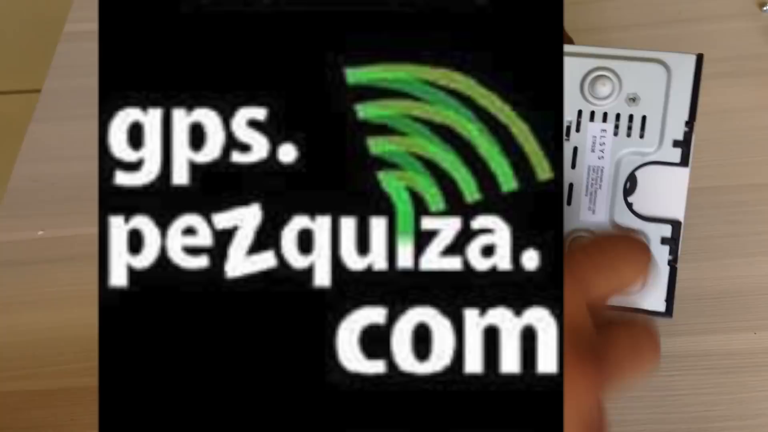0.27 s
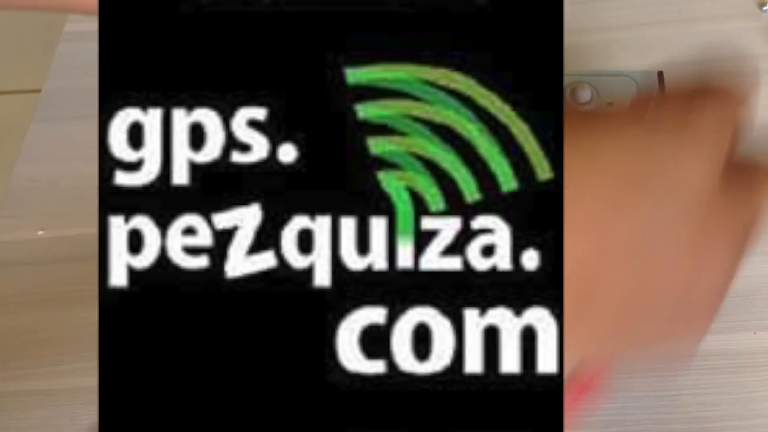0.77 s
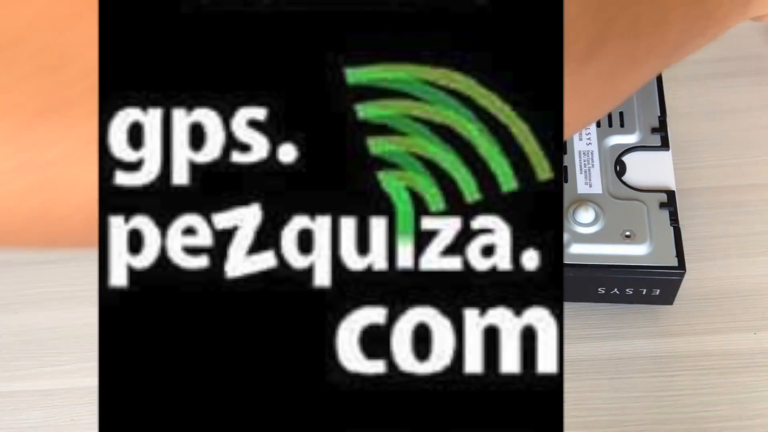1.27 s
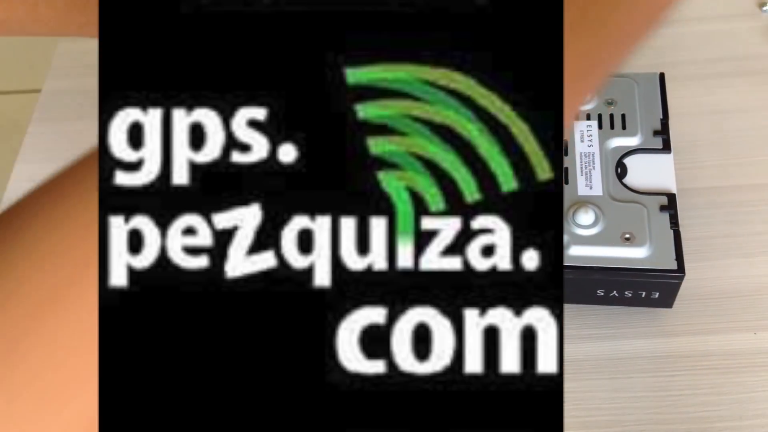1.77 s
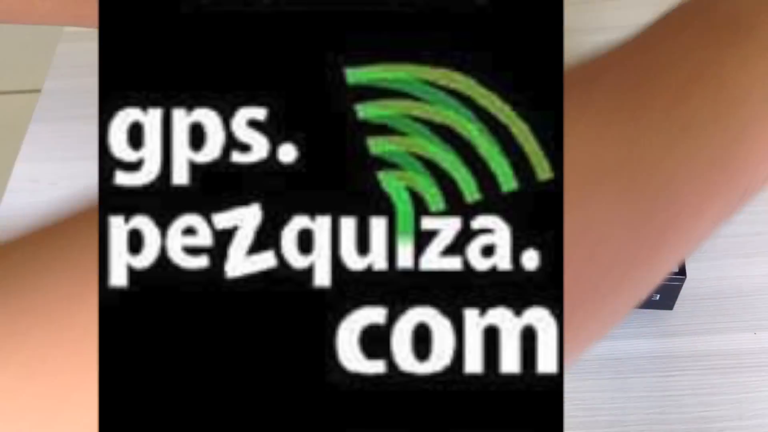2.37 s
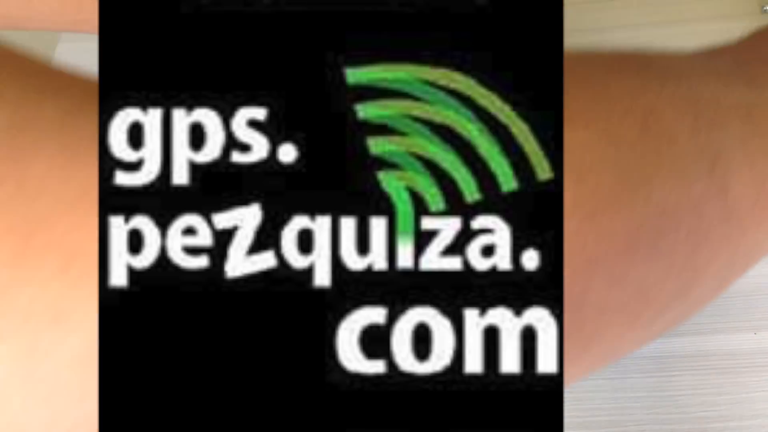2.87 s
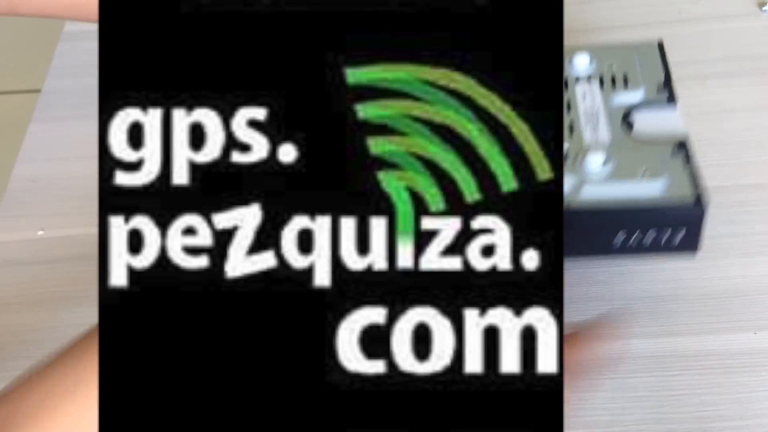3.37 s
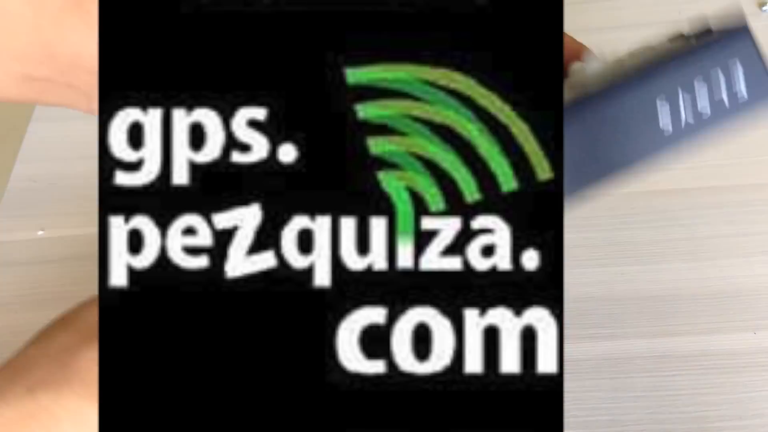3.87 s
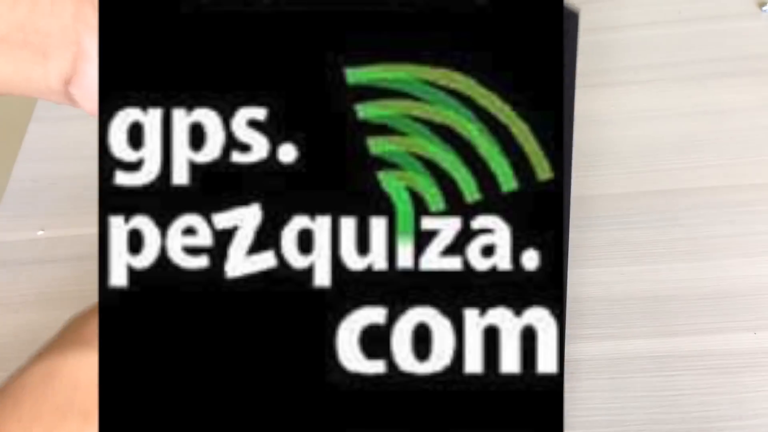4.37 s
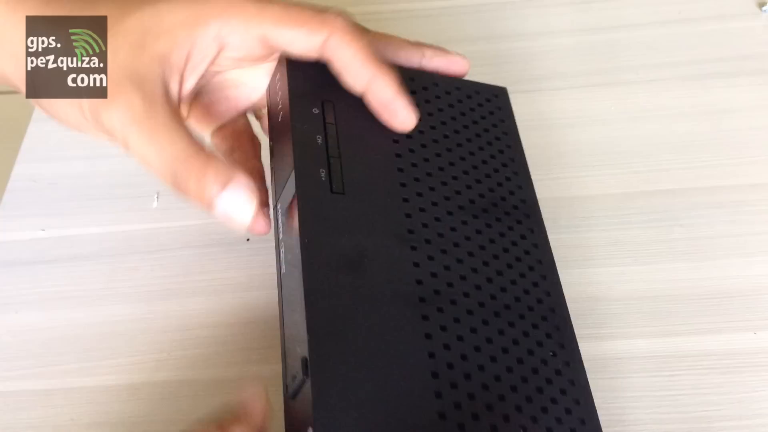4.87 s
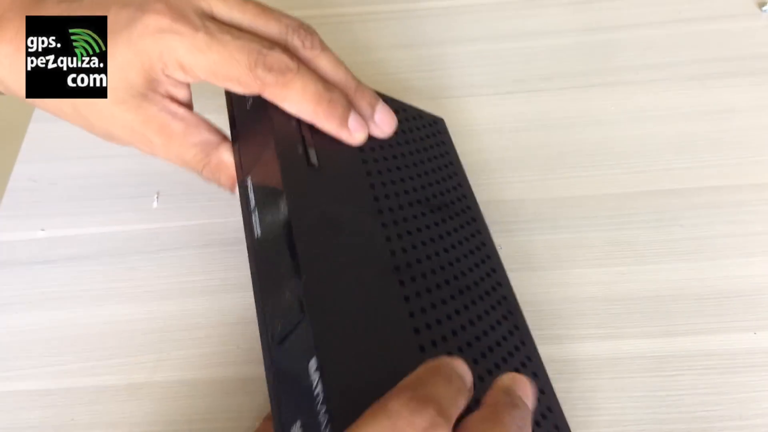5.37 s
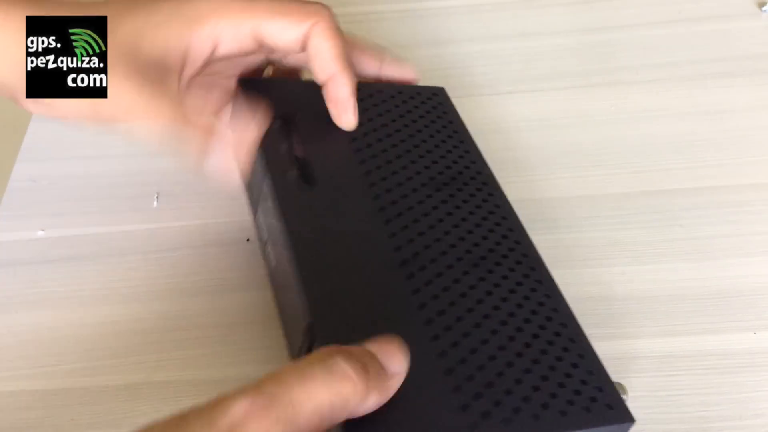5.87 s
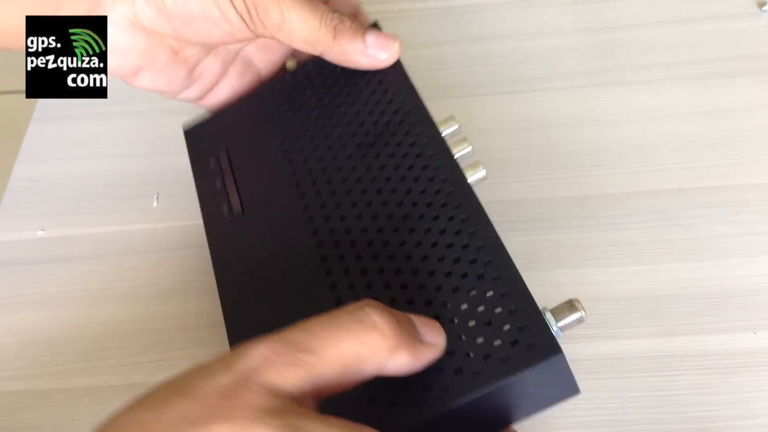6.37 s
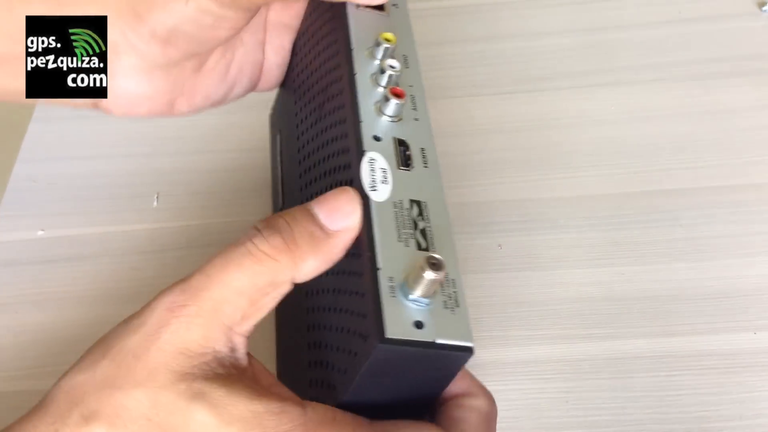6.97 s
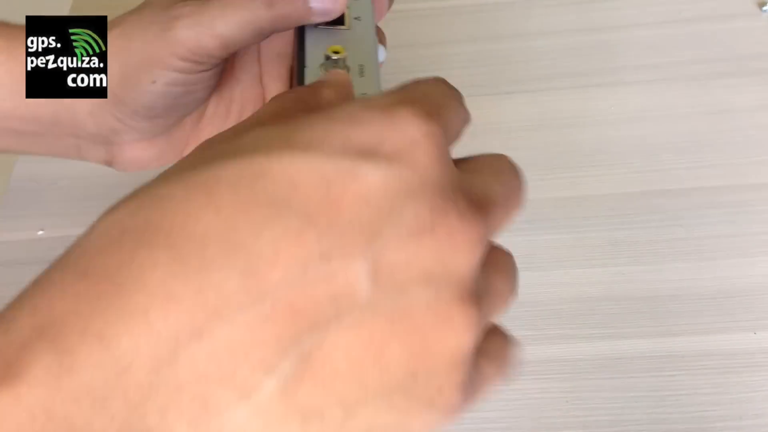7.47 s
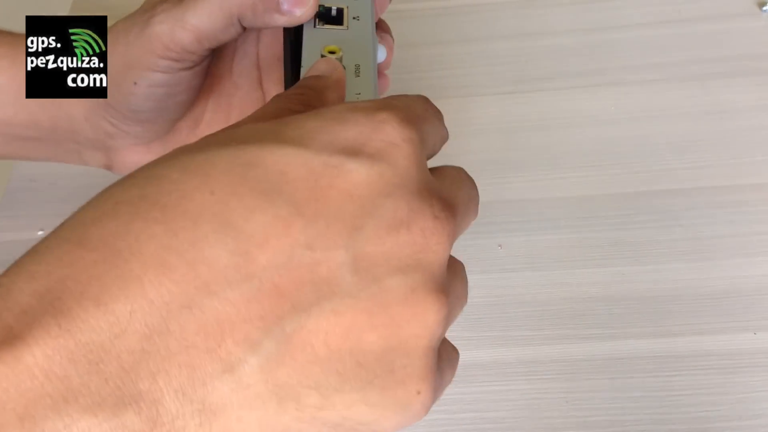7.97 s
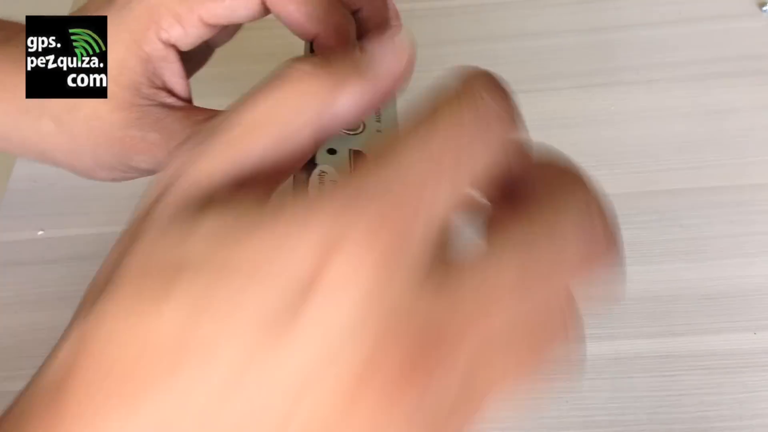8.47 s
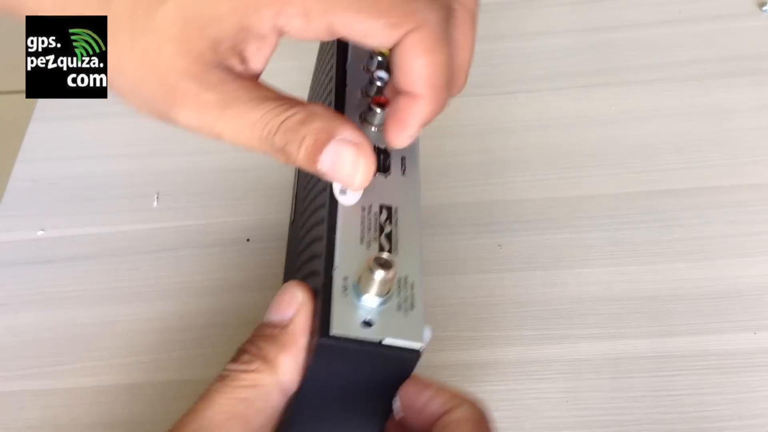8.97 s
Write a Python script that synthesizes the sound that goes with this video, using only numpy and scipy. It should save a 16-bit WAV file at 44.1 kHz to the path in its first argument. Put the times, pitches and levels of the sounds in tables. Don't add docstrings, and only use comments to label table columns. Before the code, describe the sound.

Close handling of a sheet-metal box on a wooden board, with small screw ticks, a dropped tool's bright clatter, hard knocks, rubbing and creaks.

```python
import sys
import numpy as np
from scipy import signal
from scipy.fft import rfft, irfft, next_fast_len
from scipy.io import wavfile
from scipy.ndimage import uniform_filter1d, map_coordinates

SR = 44100
rng = np.random.default_rng(int(sys.argv[2]) if len(sys.argv) > 2 else 0)


def wav_out(sig):
    wavfile.write(sys.argv[1], SR, np.round(np.clip(np.atleast_2d(sig).T, -1, 1) * 32767).astype(np.int16))


def how_loud(loudness_db):
    steps = np.asarray(loudness_db, float) / 20
    return 10 ** steps


N = 406161

# pitch_hz, density_db
HISS_COLOUR = [(25, -26.5), (55, -7.5), (190, -7.5), (250, -1), (400, -8.5), (1600, -12), (8000, -13.5),
               (16000, -15)]
# pitch_hz, width_hz, level_db
BOARD_MODES = [(90.6, 22, -24.5), (157, 13, -4.5), (198.2, 26, 2.5), (208.8, 49, 0)]
# pitch_hz, width_hz, level_db
CASE_MODES = [(364, 70, 3.5), (476.5, 120, 3), (580, 210, 1), (700, 420, -10.5)]
# until_s, then rows of pitch_hz, width_hz, level_db
COVER_GRIPS = [
    (1.2, [(720, 200, 6), (1000, 300, 11), (1900, 1700, 1)]),
    (4.04, [(1000, 630, -2.5), (1680, 140, -0.5), (2110, 390, -2)]),
    (5.0, [(1140, 580, -1.5), (1520, 340, 2), (2070, 620, -1.5)]),
    (9.0, [(1004, 200, 0.5), (1504, 310, 0), (2213, 410, 0), (2750, 300, -1.5), (3150, 490, -3.5), (4234, 600, -7)]),
    (9.3, [(1700, 380, -1.5), (2470, 350, 1), (3200, 860, -4.5)]),
]
# pitch_hz, width_hz, level_db
EDGE_MODES = [(2900, 140, -1), (3744, 1200, -2.5), (5300, 1200, -3), (9000, 10000, -11.5)]
# peak_s, swell_s, fade_s, board_push_db, case_over_push_db
SLIDES = [(.45, 0.35, .5, -71, -35), (.6, 0.013, 0.36, -62, -22), (.7, 0.14, 0.27, -48, -12),
          (2.44, 0.22, 0.8, -67, -16), (4.014, 0.096, .15, -51, -14.5), (4.12, .08, 0.098, -40.5, -4.5),
          (4.154, 0.084, 0.055, -24.5, -11), (4.33, 0.26, 0.21, -42, -12.5),
          (4.408, 0.046, 0.19, -38.5, -19), (4.476, 0.025, 0.3, -34.5, -13.5),
          (4.8, 0.29, 0.041, -50, -14.5), (5.17, .55, 1, -65.5, -6), (5.45, 0.071, 0.076, -42, -7),
          (5.526, 0.0099, 0.023, -49, 0), (5.6, 0.23, 0.12, -38, -5), (5.665, 0.37, 0.023, -52, -2),
          (5.82, 0.24, 0.05, -49.5, 3.5), (6.35, 1.3, 0.34, -71.5, -7.5), (7.72, 1.8, 0.43, -69, -13),
          (8.3, 0.44, .3, -69, -11.5), (8.85, 0.37, 0.63, -71, -8), (9.03, .1, 0.097, -65, -14),
          (9.13, .2, .17, -62, -17)]
# peak_s, swell_s, fade_s, rub_db, rasp_over_rub_db
RUBS = [(.135, 0.036, 0.046, -56, -19), (.7, 0.12, 0.11, -59.5, -13), (.8, 0.3, 0.021, -59.5, -28),
        (1.15, 0.43, 0.7, -77, -7), (1.73, .12, 1, -77.5, 3), (2.45, 0.37, 0.96, -80.5, 3),
        (2.83, 0.026, 0.11, -49.5, -4), (3.95, 0.13, 0.032, -54, -7), (4.154, 0.2, 0.041, -54.5, -9),
        (4.382, 0.21, 0.3, -60.5, -4), (4.476, .04, 0.96, -67.5, -8), (4.918, 0.17, 0.53, -75.5, -1.5),
        (5.45, 0.1, 0.083, -52.5, -9), (5.56, 0.11, 0.26, -59, -7), (5.825, .55, 0.036, -55.5, -12.5),
        (6.05, .15, 0.22, -69.5, 1.5), (6.35, .4, 0.29, -67.5, 0.5), (6.305, .03, 0.047, -57, -0.5),
        (7.53, 0.039, 0.12, -64.5, -14), (8.3, 0.043, .05, -69, -6.5), (8.34, .3, .4, -78, -6),
        (8.85, .08, .08, -69, -12.5), (9.21, .11, 0.091, -53, -8.5)]
# board_db, case_db, cover_db, edges_db
RESTING_HANDS = (-86.5, -82, -87, -83)
# start_s, peak_db, ring_hz, body_db, edge_db
LANDINGS = [
    (.116, -34, 2580, -14, -34),
    (0.1486, -34.5, 2900, -15.5, -6),
    (3.853, -26, 5400, -21, -25),
    (3.8531, -12.5, 1800, -20.5, -4),
    (4.9183, -46.5, 3070, -5.5, -13),
    (5.4046, -18.5, 1550, -11.5, -15.5),
    (6.433, -37, 1750, -34, -31),
    (7.058, -34, 1750, -2, -15),
    (7.5044, -33.5, 1480, -10, -42),
]
# start_s, peak_db, ring_hz, body_db, contact_ms
TAPS = [(.1295, -47, 2900, -14, 5), (.1545, -39, 4350, -16, 3.9), (4.778, -60, 4300, -20, 4),
        (5.194, -54.5, 2900, -15, 7.6), (5.33, -55, 2900, -15, 10), (5.427, -37.5, 2050, -9, 6),
        (5.573, -51, 1500, 8, 6), (5.601, -49.5, 1500, 10, 6), (5.735, -52, 4300, -10, 8),
        (5.828, -53, 2200, -5, 8), (.1604, -46.5, 2143, 6.5, 6.6), (.9037, -54.5, 1220, 26, 4),
        (4.0917, -52, 2060, -3, 17), (4.105, -48, 1300, 0, 9), (4.7411, -56, 2730, -6, 35),
        (4.068, -54, 1780, -7, 8.6), (5.52, -39, 1400, 12, 7.9), (6.163, -49, 2500, -15, 6.4),
        (8.475, -59.5, 1600, -10, 5.8), (9.112, -55.5, 1700, -20, 6), (7.063, -44, 3950, -13, 15),
        (6.506, -55, 3000, -20, 4), (6.834, -49, 2780, -20, 16), (7.2255, -55, 2920, -11, 11),
        (8.313, -55, 1365, -15, 11), (8.9744, -60.5, 1884, -12.5, 10.5), (9.1336, -54, 2430, -15, 20)]
# pitch_hz, width_hz, level_db
CLOSED_CASE = [(1700, 150, 2), (1930, 150, 2), (2420, 200, 2.7), (2920, 250, 4), (3600, 350, 2),
               (4300, 510, 3), (5050, 450, 3)]
# pitch_hz, width_hz, level_db
COVER_MODES = [(1665, 31, -2.5), (2010, 76, -2.5), (2460, 80, -6.5)]
# start_s, peak_db, pitch_hz, hardness_db, legs_db
NUDGES = [(0.151, -53, 192, -8.5, -20), (.434, -50.5, 169, -17, -24), (0.555, -56, 171, -22, -25),
          (0.615, -41, 186, -20, -37), (.798, -35.5, 196, -18, -46), (5.111, -43.5, 183, -4, -30),
          (5.269, -48.5, 202, -4, -24), (5.571, -48, 190, 6, -40), (5.599, -41.5, 190, 4.5, -40),
          (6.06, -38.5, 181, -34, -35), (6.097, -43, 172, -39, -13), (6.182, -49.5, 176, -26, -21),
          (7.169, -55, 165.5, 0, -11), (7.744, -46, 192, -19, -40), (8.214, -54, 168, -9.5, -33),
          (8.452, -46.5, 176, -16, -14.5), (8.715, -51.5, 172, -30, -18), (8.825, -51.5, 172, -14, -40)]
# start_s, peak_db, pitch_hz, hardness_db, ring_t60_s
BLOWS = [(2.779, -47.5, 178, -17, 0.23), (3.8547, -20, 186.3, -16, 0.13), (3.909, -26, 183, -13, 0.14),
         (4.039, -31.5, 200, -13, 0.062), (4.069, -33.5, 203, -8, 0.11), (4.137, -15.5, 194.7, -16.5, 0.13),
         (4.193, -34, 175, -28, 0.041), (4.401, -28.5, 185.6, -7, 0.15), (4.428, -29, 205, -31, 0.074),
         (4.476, -23, 195, -12.5, 0.093), (4.712, -42, 185.7, -30, 0.31), (4.86, -50, 189.7, -8.5, 0.28),
         (4.912, -46, 191.7, -12, 0.17), (5.405, -18.5, 181, -8.5, 0.031), (5.519, -31, 185, -3, 0.092),
         (7.0554, -27.5, 171.2, -0.5, 0.06), (7.5, -36, 172, -1, 0.087), (8.314, -37, 183.7, -12, 0.12),
         (8.973, -33, 183, -9.5, 0.072)]
# start_s, peak_db, ring_hz, body_db, edge_db
STRAYS = [(0.69, -45.5, 3800, -8, -18), (.708, -52, 3300, -10, -20), (.722, -50.5, 3200, -5, -17),
          (0.99, -53, 3000, -28, -22), (2.1089, -38.5, 8000, -33, -31), (2.131, -47.5, 2510, -27, -18),
          (2.279, -51, 7960, -31, -19), (2.383, -51, 3600, -36, -21), (2.4239, -52.5, 3150, -27, -22),
          (2.6846, -61, 3120, -29, -15), (3.3815, -34, 2200, -28, -0.5)]
# pitch_hz, width_hz, level_db
SMALL_PARTS = [(3200, 530, -8.5), (4800, 900, -5)]
# start_s, peak_db, ring_hz
SHANK = [(1.5653, -40, 5140), (1.738, -43, 4500), (1.79, -47, 2250), (1.806, -47, 2510),
         (1.8213, -49, 2270), (1.8497, -43.5, 7240), (1.857, -48, 2430), (1.88, -51, 2210),
         (1.8997, -50, 4500), (1.917, -53, 2240)]
# start_s, peak_db
HEAD = [(1.5753, -32.5), (1.6342, -34.5), (1.6776, -36), (1.7148, -38), (1.7521, -39.5), (1.7843, -41.5)]
# start_s, peak_db
TIP = [
    (2.11, -40.5),
    (2.1565, -49),
    (2.2914, -42.5),
]
# pitch_hz, width_hz, level_db
SHAFT = [(3000, 300, 0), (5600, 260, 1.5), (8140, 350, 0.5), (11000, 440, -14)]
# start_s, end_s, start_hz, end_hz, level_db
SQUEAKS = [(2.671, 2.72, 3100, 3100, -70), (4.2, 4.248, 2850, 2900, -64), (4.375, 4.44, 2800, 2720, -60.5),
           (4.555, 4.642, 2730, 2835, -65), (4.657, 4.683, 718, 885, -57.5), (5.279, 5.29, 1640, 1660, -59),
           (4.292, 4.345, 5300, 5350, -70), (6.039, 6.074, 1560, 1655, -68)]
# start_s, peak_db, ring_hz, edge_db, contact_ms
CLATTER = [(2.7813, -12.5, 5360, 2.5, 4.4), (2.7966, -4.5, 9600, -19, 3.8), (2.8063, -15, 4150, -25, 5.1),
           (2.818, -35, 6000, -12, 4), (2.836, -28, 1780, -17, 6.4), (2.8485, -33, 4480, -12, 2.8),
           (2.857, -38, 4000, -15, 3), (2.8733, -37, 1900, -21, 4), (2.8842, -39, 1720, -16, 4),
           (2.8935, -44, 900, -30, 4.6), (2.9596, -48, 3200, 0, 5)]
# start_s, peak_db, ring_hz
RATTLE = [(4.1416, -34.5, 1810), (4.155, -44, 1200), (4.1676, -39.5, 1940), (4.1814, -39, 2900),
          (4.1944, -47, 2200), (4.206, -39, 2880), (4.2466, -43.5, 1830), (4.2838, -45, 1930),
          (4.294, -50, 1900), (4.313, -47, 1790), (4.338, -49, 1760), (4.3581, -47.5, 2200),
          (4.3879, -50, 1790), (4.4, -51, 1990), (4.411, -45.5, 1410), (4.4294, -51, 1220),
          (4.4796, -43, 2680)]
# pitch_hz, width_hz, level_db
LOOSE_COVER = [(1900, 250, 4), (2850, 300, 4), (3780, 400, 4), (5400, 270, 3), (5870, 250, 4),
               (6700, 250, 4)]
# start_s, peak_db, ring_hz, body_db, contact_ms
SWIPES = [
    (6.5, -52.5, 1660, -16, 13),
    (5.2, -54, 2500, -11, 6),
    (6.266, -36, 2100, -40, 4.1),
    (6.2728, -19.5, 2550, -42, 3.5),
    (8.432, -51.5, 1800, -29, 8),
]
# pitch_hz, t60_s
ROOM_DECAY = [(200, 0.43), (1000, 0.21), (4000, 0.28), (12000, 0.067)]


def unit(x):
    return x / np.sqrt(np.mean(x ** 2) + 1e-20)


def along(points, hz):
    f, v = np.transpose(points)
    return np.interp(np.log(hz + 1), np.log(f + 1), v)


def filtered(x, response):
    m = next_fast_len(len(x) + min(len(x), 8192))
    spectrum = rfft(x, m) * response(np.fft.rfftfreq(m, 1 / SR))
    return irfft(spectrum, m)[:len(x)]


def modes(rows):
    def response(f):
        total = 0
        for k, (hz, width, db) in enumerate(rows):
            total = total + (-1) ** k * how_loud(db) * 1j * f * width / (hz * hz - f * f + 1j * f * width)
        return total
    return response


def lumpy(rate, depth_db):
    knots = rng.standard_normal(int(N * rate / SR) + 4)
    level_db = depth_db * map_coordinates(knots, [np.arange(N) * rate / SR])
    return how_loud(level_db) * rng.standard_normal(N)


def add(track, s, sound):
    part = track[round(s * SR):][:len(sound)]
    part += sound[:len(part)]


def room_hiss():
    noise = filtered(rng.standard_normal(N), lambda f: how_loud(along(HISS_COLOUR, f)))
    return how_loud(-70) * unit(noise)


def strokes(rows, rest_db):
    t = np.arange(N) / SR
    power = np.ones((2, N)) * how_loud(np.array(rest_db))[:, None] ** 2
    for s, swell, fade, db, over_db in rows:
        away = np.where(t < s, (s - t) / swell, (t - s) / fade)
        shape = how_loud(db - 20 * away) ** 2
        power = power + shape * np.array([[1], [how_loud(over_db) ** 2]])
    return np.sqrt(power)


def handling():
    t = np.arange(N) / SR
    push, drag = strokes(SLIDES, RESTING_HANDS[:2])
    rub, rasp = strokes(RUBS, RESTING_HANDS[2:])
    board = filtered(lumpy(rate=32, depth_db=3.5), lambda f: modes(BOARD_MODES)(f) * modes([(170, 250, 0)])(f) ** 2)
    case = filtered(lumpy(rate=85, depth_db=3), lambda f: modes(CASE_MODES)(f) * modes([(500, 800, 0)])(f))
    slips = lumpy(rate=120, depth_db=2)
    grips = []
    for _, rings in COVER_GRIPS:
        grip = filtered(slips, lambda f: modes(rings)(f) ** 2 * modes([(1600, 3000, 0)])(f))
        grips.append(unit(grip))
    held = np.searchsorted([until for until, _ in COVER_GRIPS], t)
    cover = np.choose(held.clip(0, len(COVER_GRIPS) - 1), grips)
    edges = filtered(lumpy(rate=260, depth_db=2.5), lambda f: modes(EDGE_MODES)(f) * modes([(4000, 6000, 0)])(f))
    return push * unit(board) + drag * unit(case) + rub * cover + rasp * unit(edges)


def contacts(rows, sharp, spike, rise, spread, plate):
    size = 2048
    near, far, t = np.zeros(N), np.zeros(N), np.arange(size) / SR
    f = np.fft.rfftfreq(2 * size, 1 / SR)

    def peak(response):
        return abs(irfft(response)).max()

    under = 1 + sum(modes([row])(f) for row in plate)
    edge = modes([(8500, 10000, 0)])(f) ** 2 / (1 + (f / 14700) ** 30)
    body = modes([(650, 250, -2), (950, 220, 0), (1300, 400, -4)])(f) * modes([(850, 1300, 0)])(f)
    for s, db, hz, low_db, edge_db, ms in rows:
        decay = how_loud(-60 * (t - rise) / (0.0063 * max(ms, .3)))
        chatter = rng.standard_normal(size) * np.where(t < rise, (t / rise) ** 3, decay)
        chatter[8] += spike
        chatter += 0.39 * np.roll(chatter, int(rng.uniform(14, 34)))
        push = rfft(chatter, 2 * size)
        push = push / np.sqrt(uniform_filter1d(abs(push) ** 2, size=36))
        ring = modes([(hz, hz / sharp, 0), (2600, 1500 * spread, -6)])(f)
        ring = ring * modes([(hz, spread * hz, 0)])(f) * under
        colour = ring / peak(ring)
        colour = colour + how_loud(edge_db - 1.0) * edge / peak(edge) + how_loud(low_db + 7.0) * body / peak(body)
        colour = colour * how_loud(db) / peak(push * colour * (f > 1200))
        add(near, s - .0003, irfft(push * colour)[:size])
        add(far, s, irfft(colour)[:size])
    return np.array([near, far])


def case_knocks():
    rows = [(*row, 5.3) for row in LANDINGS]
    rows += [(*row, -25, ms) for *row, ms in TAPS]
    return contacts(rows, sharp=4.5, spike=5, rise=0.00044, spread=2.44, plate=CLOSED_CASE)


def board_thuds():
    track, t = np.zeros(N), np.arange(SR // 3) / SR

    def ring(hz, t60, rise):
        return np.sin(2 * np.pi * hz * t) * how_loud(-60 * t / t60) * (1 - np.exp(-t / rise))

    rows = [(*row, -25.5, t60) for *row, t60 in BLOWS]
    rows += [(*row, .085) for row in NUDGES]
    for s, db, hz, hard_db, legs_db, t60 in sorted(rows):
        luck = rng.normal(0, 1, 8)
        beat = 0.63 + 0.39 * np.cos(2 * np.pi * (25 + 1.2 * luck[7]) * (t - .008))
        boom = ring(hz, 1.5 * t60, 0.0036) * beat
        legs = ring(86, .13, .003)
        knock = sum(how_loud(g + e) * ring(c * (1 + .02 * e), 3.2 / w, .0012)
                    for (c, w, g), e in zip(CASE_MODES, luck))
        add(track, s, -how_loud(db) * (boom / abs(boom).max() + how_loud(legs_db + 12.0) * legs))
        add(track, s + .003, -how_loud(db + hard_db + 1.5) * knock)
    return track


def metal_ticks(rows):
    return contacts(rows, sharp=2.2, spike=13, rise=.0004, spread=4, plate=SMALL_PARTS)


def stray_ticks():
    return metal_ticks([(*row, 4.2) for row in STRAYS])


def bouncing_screw():
    rows = [(s, db, 4500, -58, -10.5, 6.8 * 0.81 ** k) for k, (s, db) in enumerate(HEAD)]
    rows += [(*row, -36, -20, 2.8) for row in SHANK]
    return contacts(rows, sharp=1.17, spike=19, rise=0.00027, spread=7.7, plate=SMALL_PARTS)


def screwdriver():
    track, t = np.zeros(N), np.arange(SR // 20) / SR
    for s, db in TIP:
        chatter = rng.standard_normal(len(t)) * how_loud(-60 * t / 0.032)
        ring = filtered(chatter, modes(SHAFT))
        add(track, s, how_loud(db - 5.0) * ring / abs(ring).max())
    return track


def squeaks():
    track = np.zeros(N)
    for start, end, hz0, hz1, db in SQUEAKS:
        over_db = -2.5 if hz0 < 1200 else -21.5
        u = np.linspace(0, 1, round((end - start) * SR))
        drift = uniform_filter1d(rng.standard_normal(len(u)), 60) * .12 * hz0
        turn = 2 * np.pi * np.cumsum(hz0 + (hz1 - hz0) * u + drift) / SR
        tone = np.sin(turn) + how_loud(over_db) * (np.sin(2 * turn) + 0.25 * np.sin(3 * turn))
        add(track, start, how_loud(db) * np.sin(np.pi * u) ** 0.59 * tone)
    return track


def tool_clatter():
    return metal_ticks([(s, db, hz, min(-52 - db, -21), edge_db, ms) for s, db, hz, edge_db, ms in CLATTER])


def cover_rattle():
    rows = [(s, db, hz, -70 - db, -30, 5.1) for s, db, hz in RATTLE]
    return contacts(rows, sharp=5.8, spike=5, rise=0.0012, spread=1.72, plate=LOOSE_COVER)


def glancing_swipes():
    rows = [(*row, -24, ms) for *row, ms in SWIPES]
    return contacts(rows, sharp=2.75, spike=0.1, rise=0.00975, spread=1.72, plate=CLOSED_CASE)


def room(x):
    wet, step = np.zeros(N), SR // 4
    for start in range(0, N, step):
        hz, t, z = signal.stft(rng.standard_normal(SR // 2), SR, nperseg=256)
        build = 1 - np.exp(-(t / 0.0073) ** 2)
        decay = how_loud(-60 * t / along(ROOM_DECAY, hz)[:, None]) + 0.4 * how_loud(-60 * t / 0.39)
        tail = signal.istft(z * build * decay, SR, nperseg=256)[1]
        answer = signal.fftconvolve(x[start:start + step], tail / np.linalg.norm(tail))
        add(wet, start / SR + 0.00099, answer)
    return wet


def scene():
    hiss = room_hiss()
    thuds = filtered(board_thuds(), lambda f: modes([(400, 3000, 0)])(f) ** 2)
    wood = handling() + thuds
    wood = filtered(wood, lambda f: 1 - .8 * modes([(120, 40, 0)])(f))
    wood = wood + squeaks()
    case = case_knocks() + cover_rattle()
    small = stray_ticks() + tool_clatter()
    screw = bouncing_screw()
    swipes = glancing_swipes()
    cover = how_loud(2.5) * filtered(case[1], modes(COVER_MODES))
    to_walls = how_loud(-17) * small[1] + how_loud(-14.0) * case[1] + how_loud(-20) * screw[1]
    to_walls = to_walls + how_loud(-22) * swipes[1] + how_loud(-13.5) * wood
    direct = small[0] + case[0] + cover + screw[0] + swipes[0] + screwdriver() + wood
    return (direct + room(to_walls) + hiss)[None]


def band_limit(x):
    return signal.sosfilt(signal.butter(12, 16410, fs=SR, output="sos"), x)


def record(dry):
    mix = filtered(dry[0], lambda f: 1 / (1 + (f / 15300) ** 80))[None]
    return band_limit(mix)


dry = scene()
out = record(dry)
wav_out(out)
```